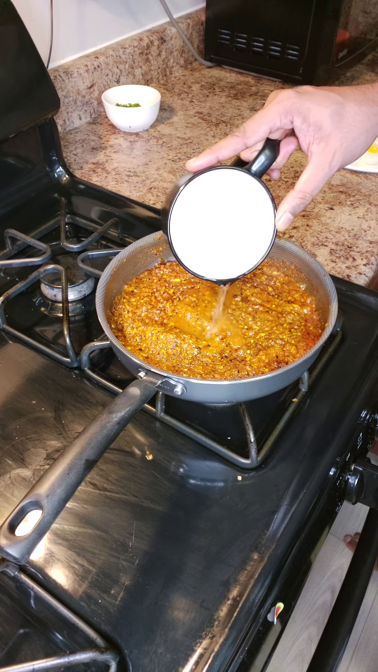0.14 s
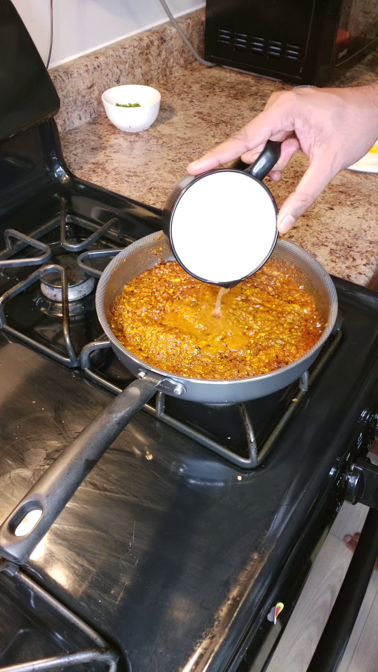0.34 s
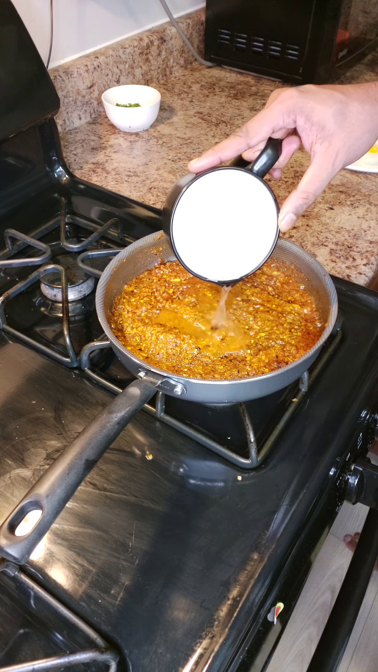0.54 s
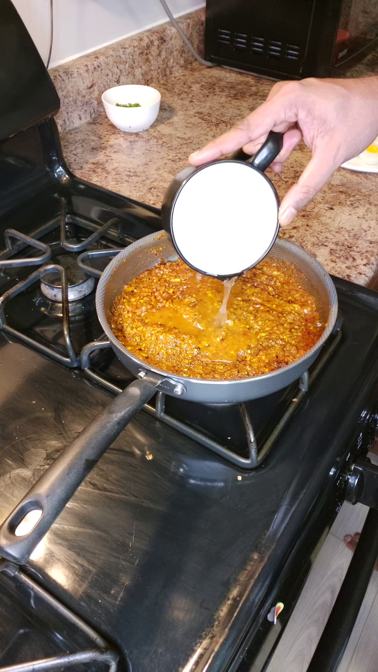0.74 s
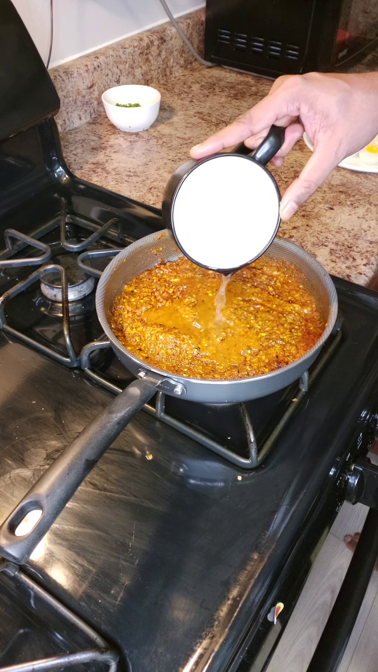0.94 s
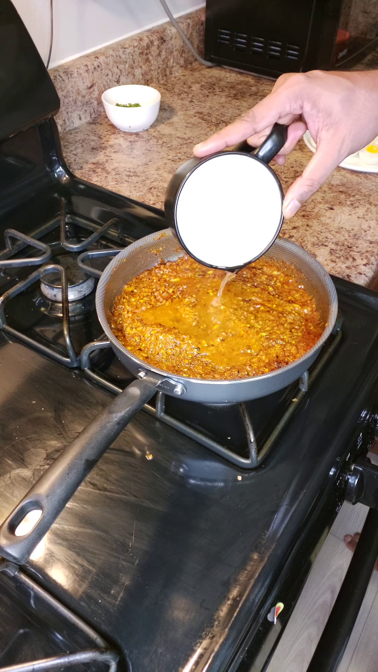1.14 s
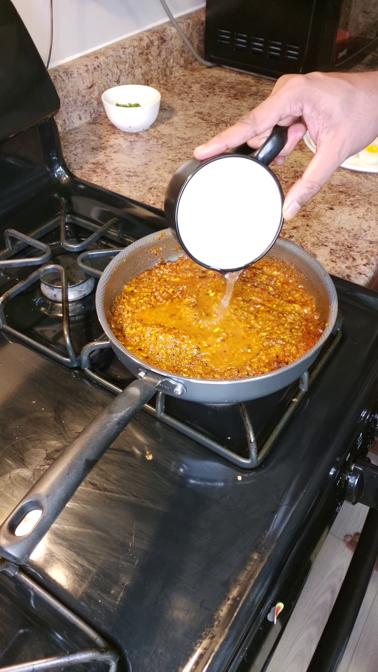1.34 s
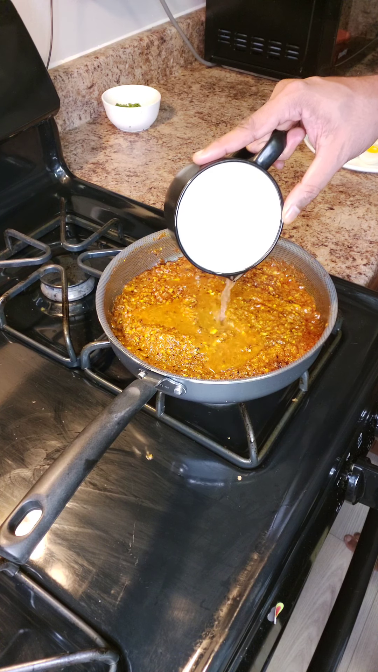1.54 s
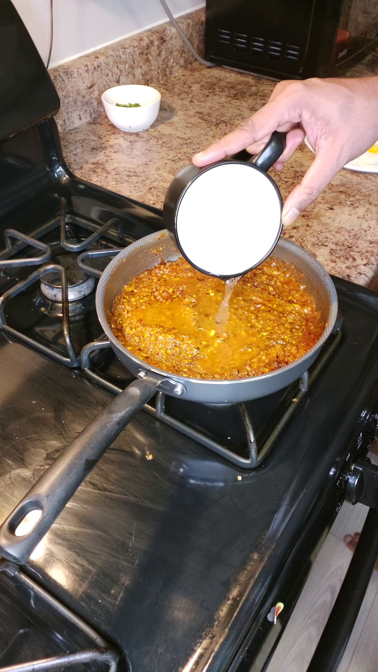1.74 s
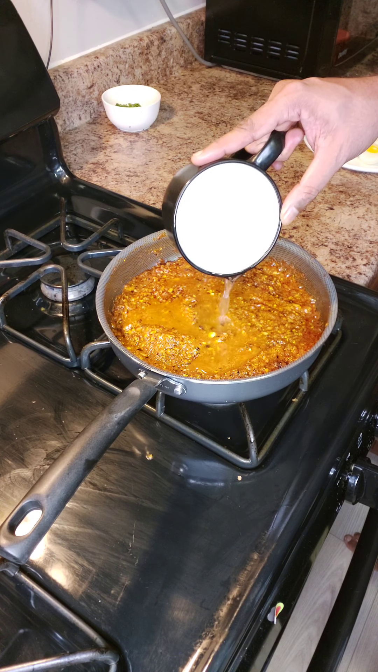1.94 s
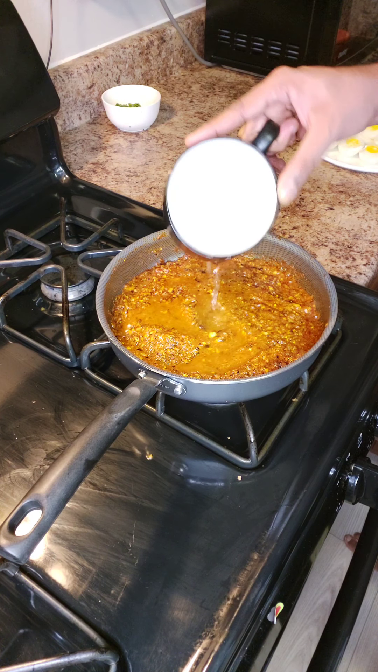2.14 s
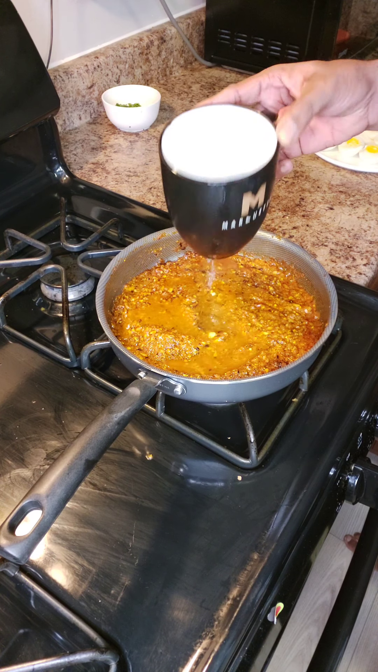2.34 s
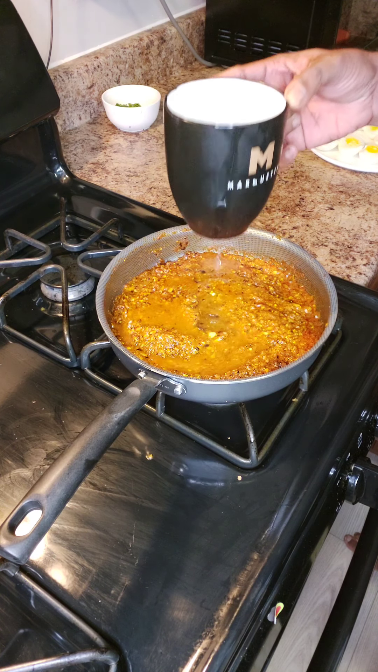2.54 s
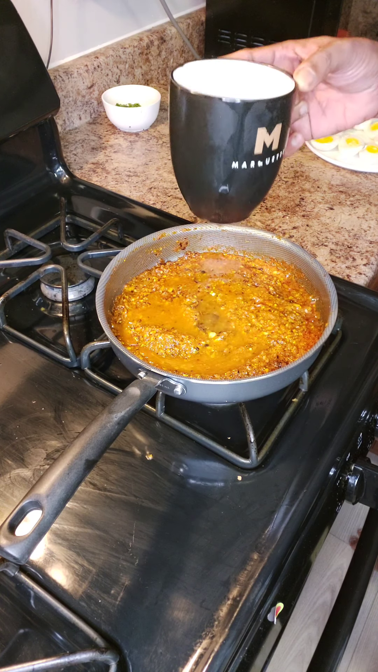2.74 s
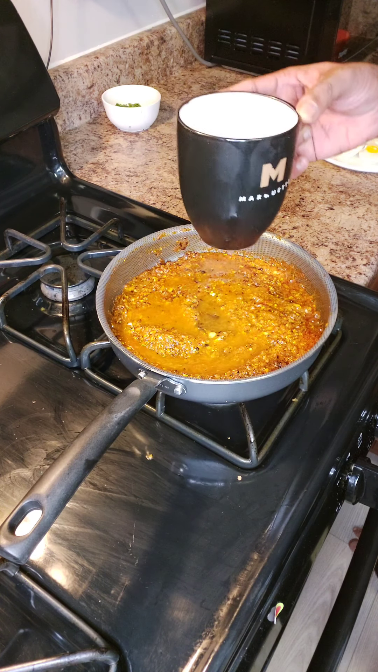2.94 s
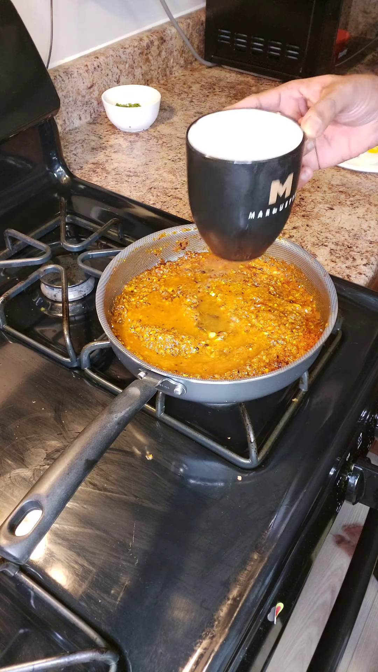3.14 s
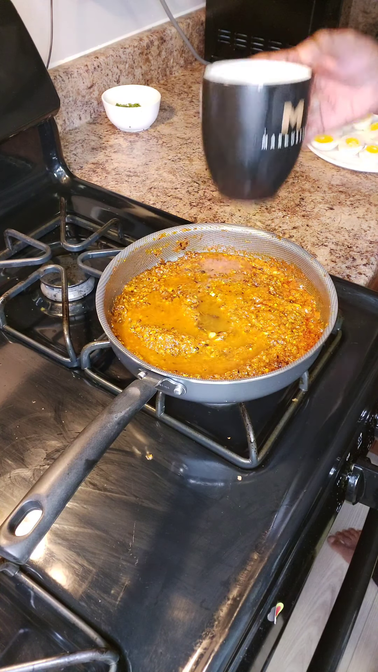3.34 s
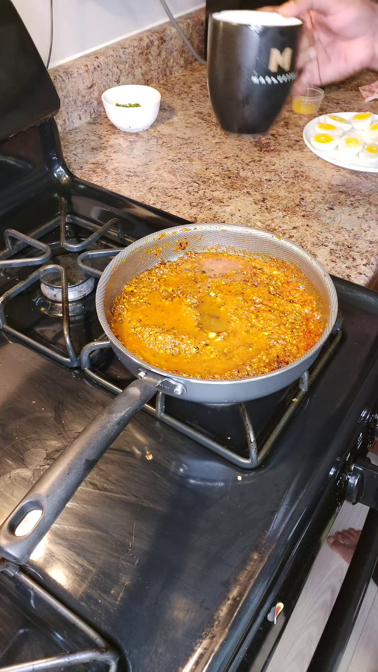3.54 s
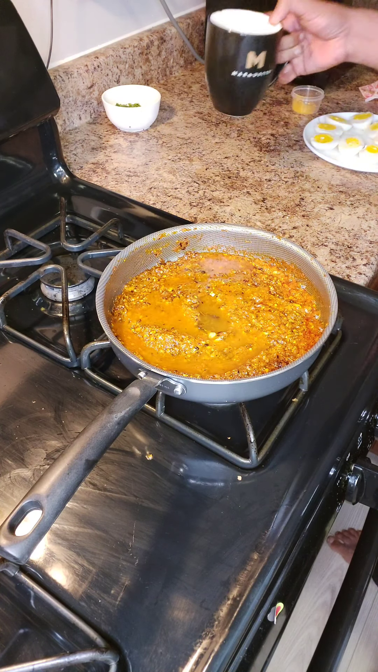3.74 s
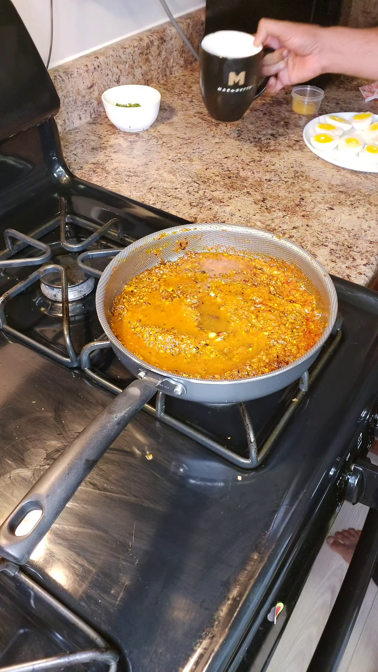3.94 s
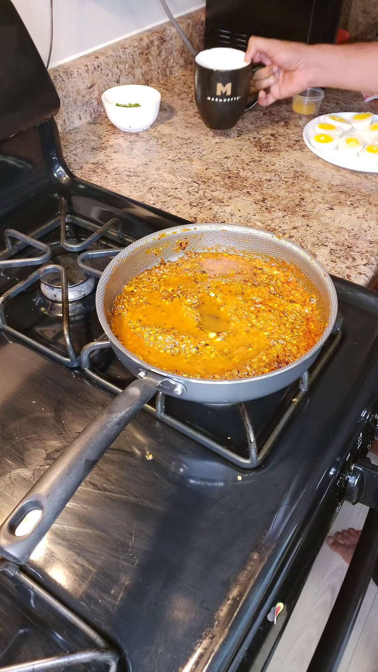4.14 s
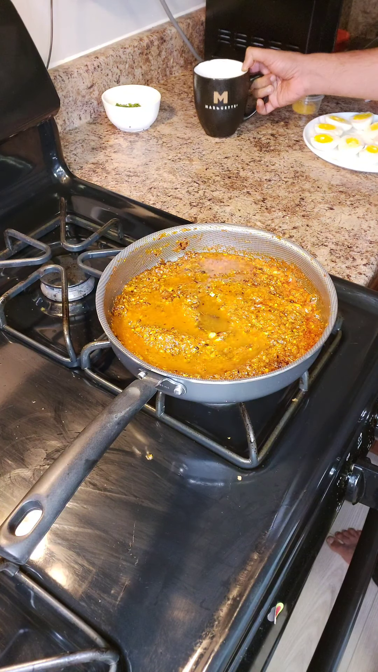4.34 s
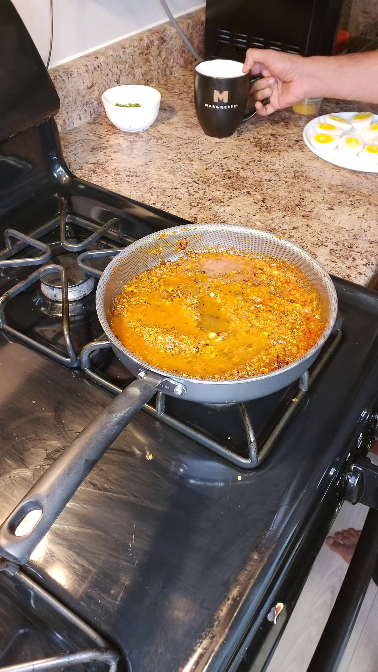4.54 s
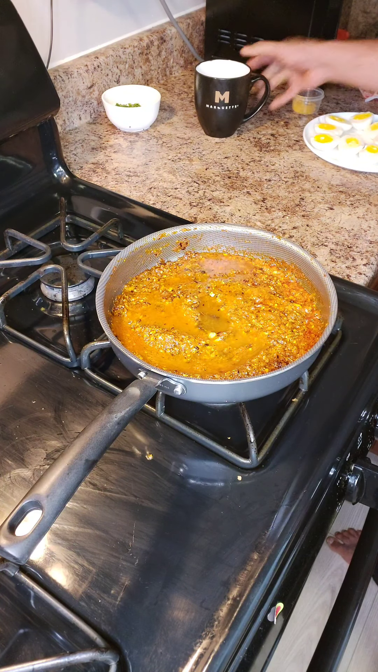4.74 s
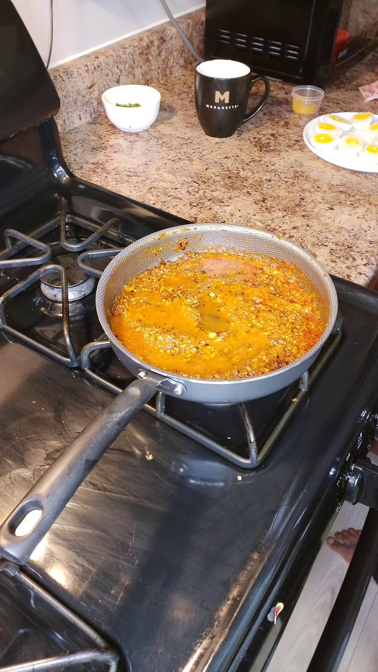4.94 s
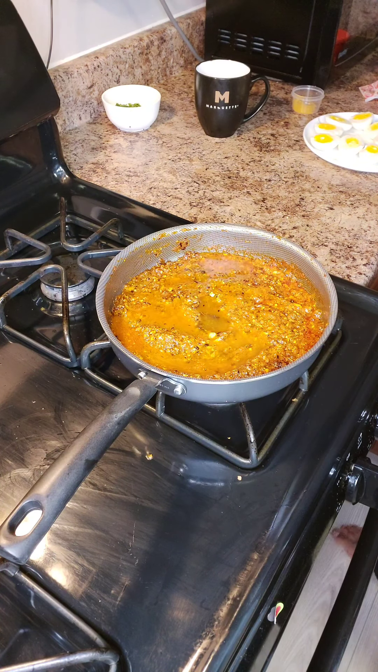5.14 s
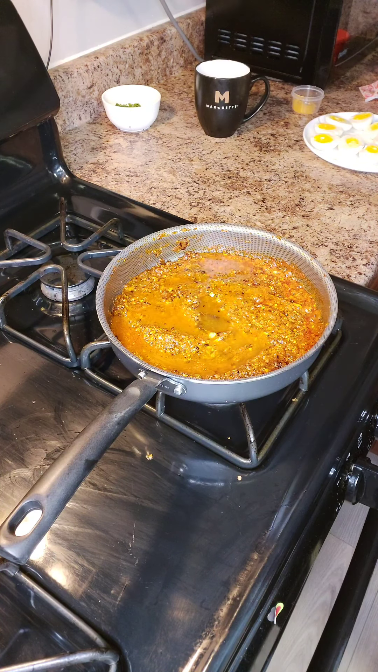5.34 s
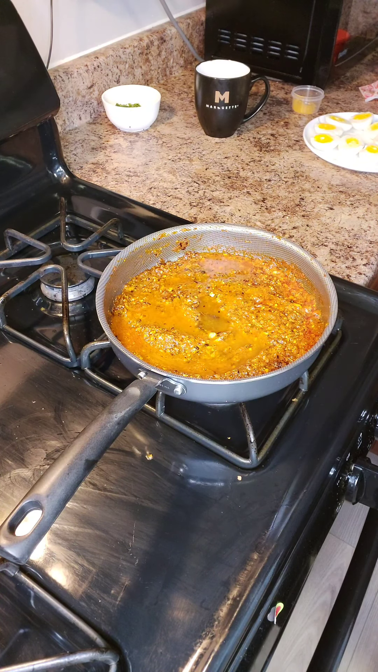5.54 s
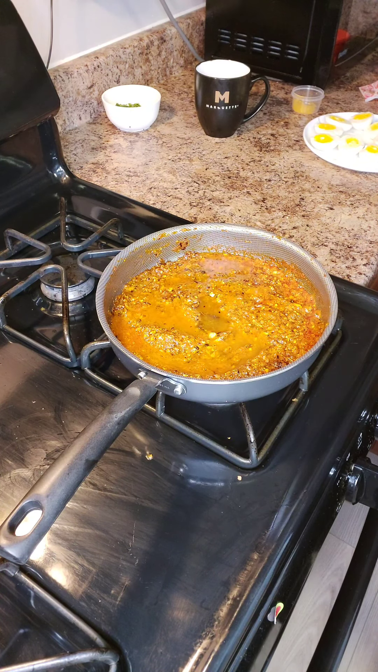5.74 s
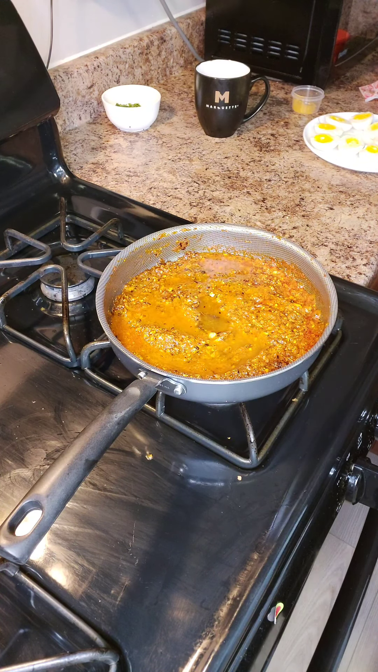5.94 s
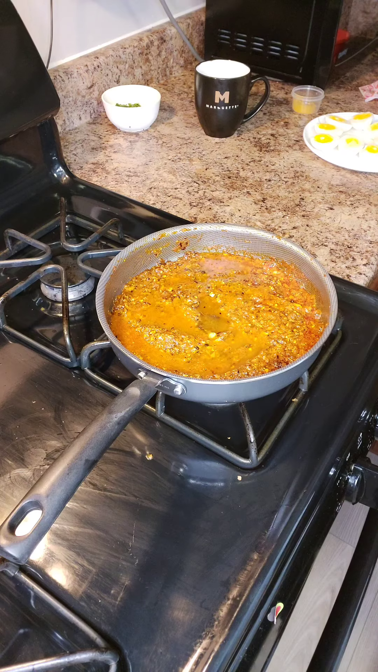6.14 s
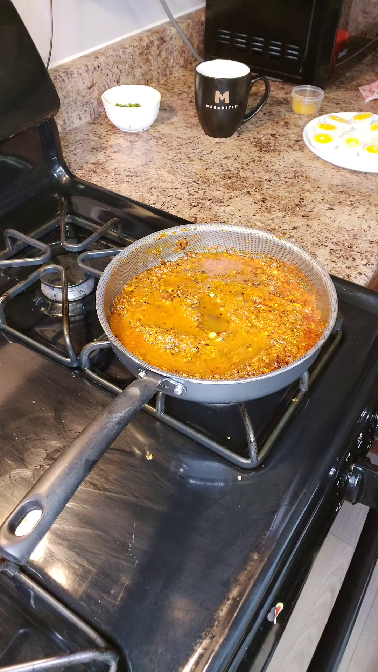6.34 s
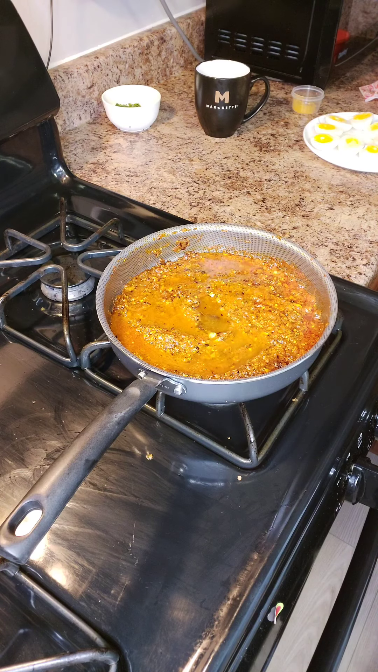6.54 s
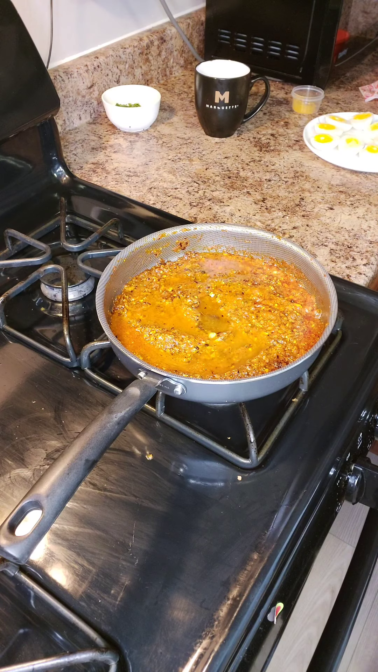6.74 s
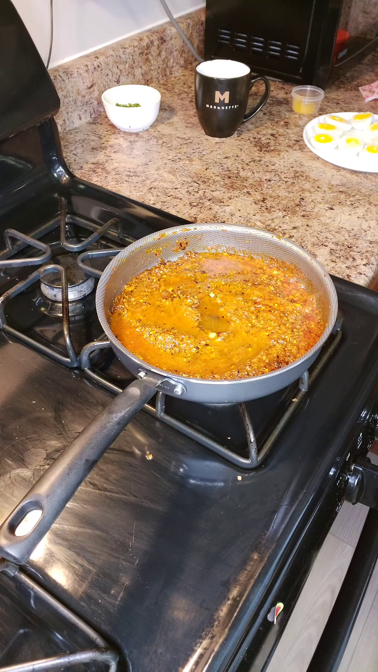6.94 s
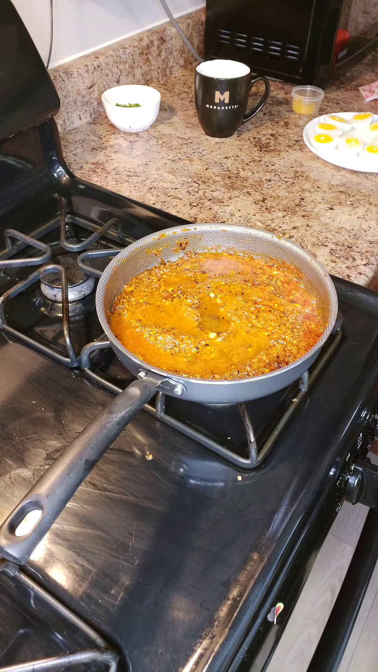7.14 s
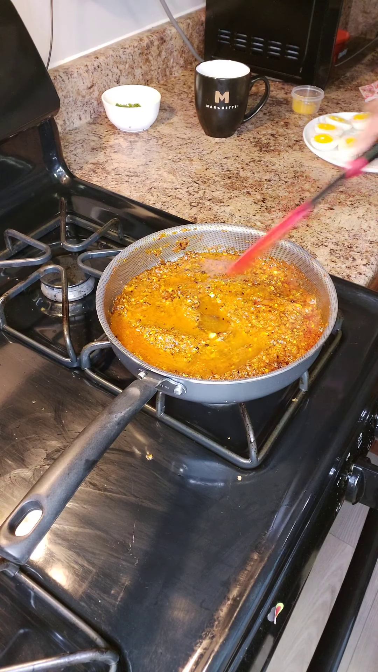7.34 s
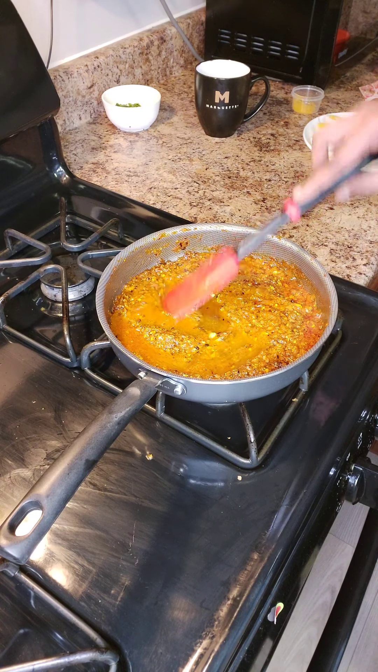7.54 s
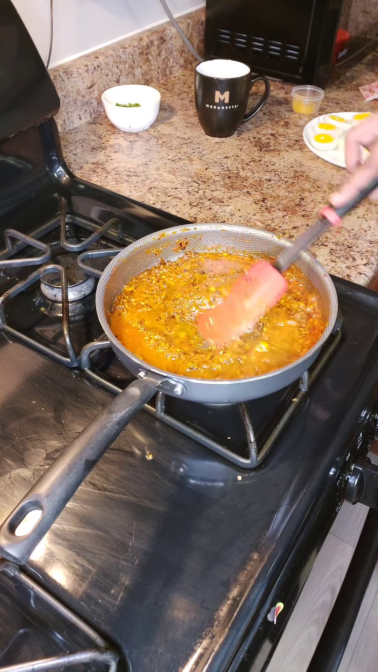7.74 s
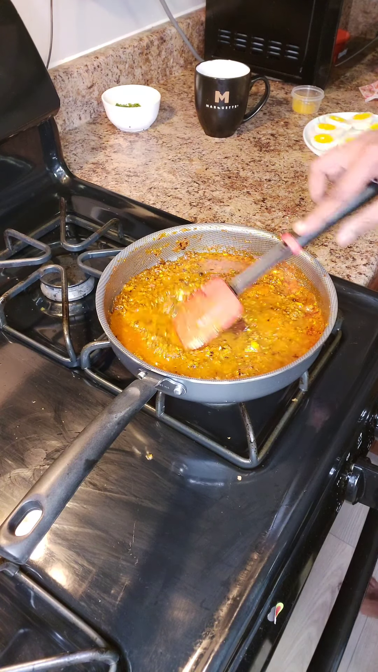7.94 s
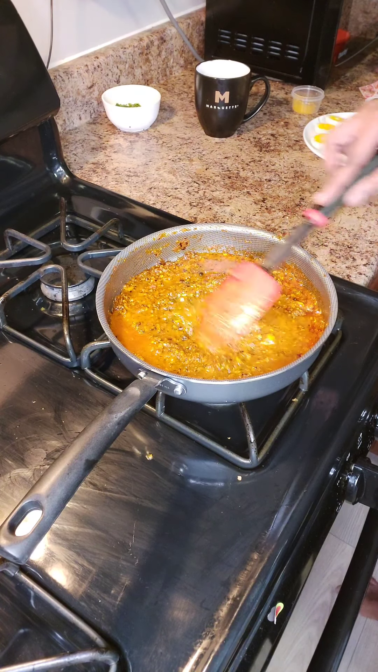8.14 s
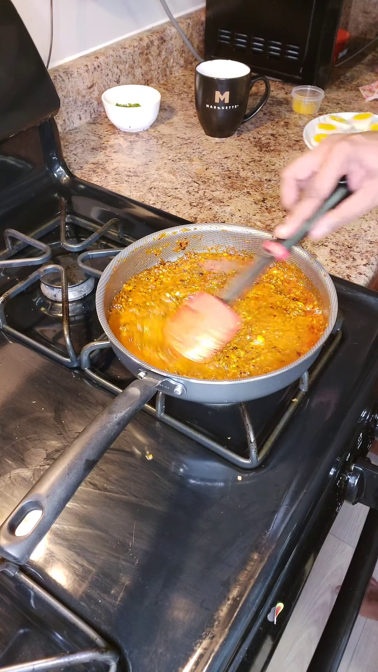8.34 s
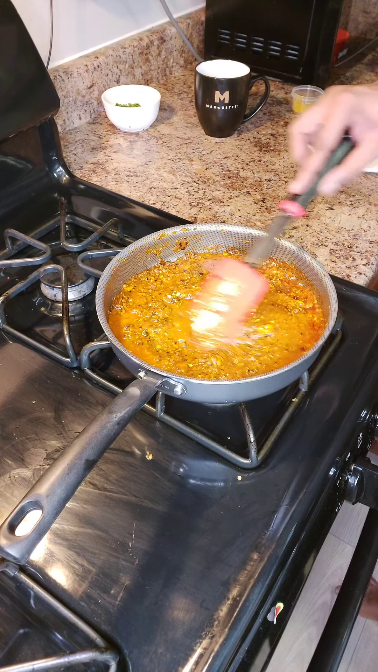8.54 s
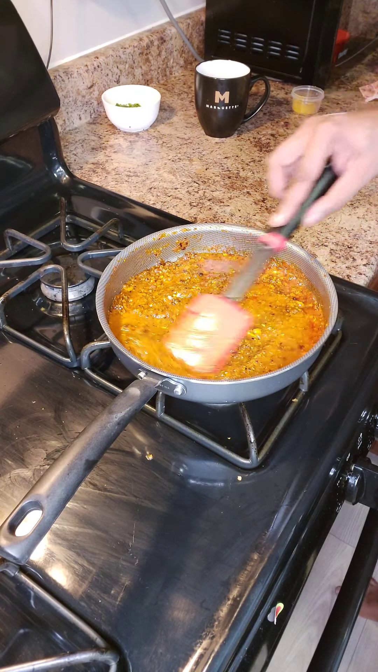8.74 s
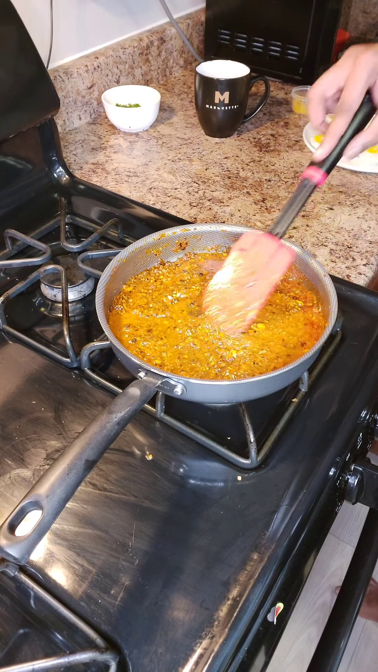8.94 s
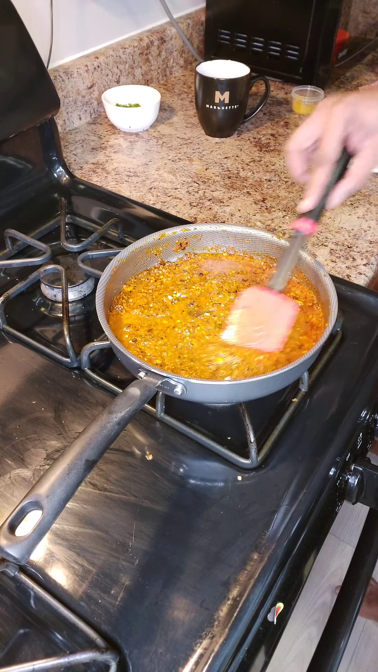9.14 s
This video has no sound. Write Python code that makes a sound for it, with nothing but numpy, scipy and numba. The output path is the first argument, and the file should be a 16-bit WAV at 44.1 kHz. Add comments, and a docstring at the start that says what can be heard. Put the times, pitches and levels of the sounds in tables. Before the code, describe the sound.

Water gurgles into simmering gravy, then a mug thuds down, a utensil clinks and a spatula squelches through the sauce.

```python
"""A small kitchen, at the stove. Gravy simmers in a pan, tiny steam bubbles fizzing over a low appliance hum.
Water poured from a mug drives air into it: large bubbles plop, droplets and bursting films spit.
The mug is set down in two thuds that shake the worktop, a utensil clinks on a dish and knocks about,
then a spatula squelches through the sauce, baring hot metal that fizzes."""
import sys
import numpy as np
from scipy import signal
from scipy.fft import rfft, irfft, next_fast_len
from scipy.io import wavfile
from scipy.ndimage import uniform_filter1d
from numba import njit

SR = 44100
rng = np.random.default_rng(int(sys.argv[2]) if len(sys.argv) > 2 else 0)


def wav_record(signal):
    """Record a signal, one row per channel, as 16-bit PCM in the file named by sys.argv[1]."""
    frames = np.transpose(np.atleast_2d(signal))
    bounded = np.clip(frames, -1, 1)
    # unit amplitude maps onto the largest positive 16-bit level
    quanta = np.round(bounded * 32767).astype(np.int16)
    wavfile.write(sys.argv[1], SR, quanta)


N = 409688
T = np.arange(N) / SR
TAIL = T[:SR]
TOP_HZ = 15900

# Tone curves. Each row: frequency in Hz, relative gain in dB.
ROOM_TONE_EQ = [(25, -10.5), (55, -5.5), (100, 1), (140, -3.5), (220, -10), (300, -3), (450, -14.5),
                (650, -4), (1000, -14.5), (1750, -16), (2200, -13), (2900, -24.5), (15000, -25.5)]
SIMMER_EQ = [(1500, -20), (3000, 0.5), (4300, 5), (7000, -1.5), (10000, 3.5), (12000, 2.5), (15500, -8.5)]
SCRAPE_EQ = [(250, 2), (700, 4), (2000, 3.5), (3000, -2), (4800, -0.5), (7500, -4.5), (11000, -4.5),
             (15500, -7)]
CRACK_EQ = [(600, 0), (1800, -4.5), (3000, -1), (4800, -3), (7500, -12), (11000, -10), (15500, -20.5)]
GURGLE_EQ = [(150, -26), (300, 9), (470, -10.5), (650, 6), (1000, -2.5), (1400, -0.5), (2200, -2.5),
             (2800, -10), (5000, -13)]
SPRAY_EQ = [(1500, -11), (2800, -3.5), (3900, 0.5), (4800, -4), (5500, -2), (7300, -6.5), (9500, -3.5),
            (12000, -1.5), (15500, -6)]
# The appliance's hum. Each row: frequency in Hz, level in dB.
HUM_PARTIALS = [(56, -68), (85, -80), (113, -75), (168, -82.5)]
# Things slid and picked up by the stove. Each row: centre and half length in seconds, level in dB.
SLIDE_CUES = [(3.27, 0.033, -59.5), (4.028, 0.039, -65), (5.252, 0.062, -60), (6.103, 0.048, -53)]
# The worktop and the cabinet under it. Each row: mode in Hz, relative level in dB, T60 in seconds.
WORKTOP_MODES = [(85, -7.5, 0.35), (120.7, -15.5, 0.46), (147, -6.5, 0.17), (190, -5.5, 0.13),
                 (249.3, -7, 0.093), (297.3, -8.5, 0.2), (322.8, -8, 0.35), (405, -1, 0.26),
                 (471, -9, 0.07), (569, -12.5, 0.42), (662, 0, 0.053), (846, -13, 0.16), (884, -3, 0.057),
                 (947, -11, .24), (1018, -5.5, 0.07), (1394, -2.5, 0.1)]
# What strikes the worktop. Each entry: contact low-pass, bass cut and own note in Hz,
# crack in dB against the thud, left minus right in dB.
STRIKERS = {"mug": (601.5, 99, 304, -29.5, 1), "dish": (1895, 300, 430, -16, 1.8),
            "utensil": (454, 65, 424, -15, 1), "soft bump": (98, 82, 121, -37, 1)}
# Blows on the worktop. Each row: start in seconds, level in dB, striker.
KNOCK_CUES = [(4.404, -18.5, "mug"), (4.432, -35, "mug"), (4.443, -29.5, "mug"), (4.57, -36.5, "mug"),
              (4.643, -25, "mug"), (4.813, -52, "mug"), (5.396, -57.5, "utensil"), (5.460, -25, "dish"),
              (5.524, -31.5, "utensil"), (5.611, -37.5, "utensil"), (5.815, -36.5, "dish"),
              (5.958, -52, "utensil"), (6.26, -57.5, "soft bump"), (6.294, -55, "soft bump"),
              (6.402, -40.5, "utensil"), (6.44, -40, "utensil"), (6.443, -39, "soft bump"),
              (6.472, -53, "utensil"), (6.534, -53.5, "utensil"), (6.531, -57.5, "soft bump"),
              (7.166, -59, "soft bump"), (8.032, -57.5, "soft bump")]
# The dish's ring. Each row: mode in Hz, relative level in dB, T60 in seconds.
DISH_MODES = [(1450, 4.5, 0.21), (1644, 1.5, 0.58), (1780, 6, 0.19), (2076, -19, 1), (2565, 2, 0.37),
              (3693, 3, 0.099), (3760, -11.5, 0.68), (4890, 0.5, 0.1), (4900, -28, 0.27), (5900, -19, 0.19),
              (6284, -4, 0.17), (7843, -5, 0.067), (9400, -10, 0.16), (11350, -12, 0.16)]
# Utensil on dish. Each row: start in seconds, level in dB, contact low-pass and bass cut in Hz.
CLINK_CUES = [(5.460, -33, 6500, 1100), (5.512, -37, 5960, 2060), (5.541, -40.5, 10900, 3200),
              (5.605, -43, 4940, 2130), (5.815, -54, 4500, 2500), (5.958, -66, 4500, 2470)]
# Spatula strokes. Each row: start and length in seconds, squelch and fizz in dB,
# opening pitch of the air pockets in Hz.
STROKE_CUES = [(7.448, .085, -67, -61.5, 1900), (7.634, 0.042, -69, -62.5, 1270),
               (7.953, 0.087, -69, -69, 1940), (8.173, 0.12, -68, -70, 2250), (8.385, .055, -66, -75, 2529),
               (8.437, 0.03, -61, -58.5, 885), (8.579, 0.14, -64, -65.5, 1500),
               (8.701, 0.053, -62.5, -61.5, 1064), (8.83, 0.018, -64, -53, 2600),
               (9.05, 0.05, -75, -88, 742)]
# Large air bubbles. Each row: start in seconds, relative level in dB, pitch in Hz.
PLOP_CUES = [(0.075, -33.5, 1400), (0.437, -32, 1420), (0.521, -33.5, 1370), (0.928, -38.5, 1110),
             (0.964, -36.5, 1060), (1.009, -36.5, 1050), (1.119, -32.5, 1150), (1.163, -38, 1200),
             (1.177, -34, 1120), (1.33, -38, 1590), (1.344, -32, 1340), (1.373, -31.5, 970),
             (1.656, -39, 1040), (1.743, -36.5, 1010), (1.825, -40.5, 1040), (1.959, -39, 980),
             (1.994, -37, 990), (2.084, -44.5, 824), (2.227, -45.5, 700), (6.734, -48.5, 674)]
# Droplets and bursting films. Each row: start in seconds, relative level in dB, pitch in Hz.
SPIT_CUES = [(.0305, -32.5, 11700), (.0624, -32.5, 9900), (.105, -31, 10200), (.316, -37, 10400),
             (.634, -37.5, 9400), (.964, -37, 9000), (1.078, -42, 3060), (1.12, -42.5, 2260),
             (1.161, -31.5, 11600), (1.5, -38, 12400), (1.518, -37.5, 5600), (1.557, -42, 3060),
             (1.6565, -38, 3700), (2.149, -34, 10500), (2.1874, -35, 12000), (2.2265, -32, 11500),
             (2.2275, -45, 2760), (2.575, -44, 12600)]
# The stream wobbles and splashes. Each row: start and length in seconds, gurgle and spray in dB.
SPLASH_CUES = [(.02, 0.12, -56, -63), (.435, 0.019, -59, -55.5), (.63, .015, -64, -52.5),
               (.96, 0.17, -54.5, -54), (1.499, 0.082, -58.5, -52.5), (1.655, 0.077, -57, -57.5),
               (1.82, 0.033, -71, -56), (2.226, 0.0072, -52, -48)]


def gain_of(db):
    """Decibels to amplitude."""
    return 10 ** (np.asarray(db) / 20)


def unit(x):
    """Scale to rms 1."""
    return x / np.sqrt(np.mean(x ** 2))


def attack_unit(x):
    """Scale a hit to rms 1 over its first 50 ms."""
    return x / np.sqrt(np.mean(x[..., :SR // 20] ** 2))


def fade(t60):
    """Exponential decay, one second long."""
    return np.exp(-np.log(1000) * TAIL / t60)


def swell(start, length_s, attack_s, release_s):
    """Envelope that rises, holds, and dies away after its length."""
    age = T - start
    return np.clip(age / attack_s, 0, 1) * np.exp(-np.maximum(age - length_s, 0) / release_s)


def walk(rate_hz):
    """Smooth random wander, spread near 1."""
    return np.interp(T * rate_hz, np.arange(N // 100), rng.standard_normal(N // 100))


def add(track, start_s, sound):
    """Drop a sound into a track."""
    first = int(start_s * SR)
    track[..., first:first + sound.shape[-1]] += sound[..., :N - first]


def pan(db):
    """Channel gains, the left louder by db."""
    return gain_of(np.array([[db], [-db]]) / 2)


def cut(x, hz, kind):
    """Second-order low-pass or high-pass."""
    return signal.sosfilt(signal.butter(2, hz, kind, fs=SR, output="sos"), x)


def colour(x, curve):
    """Minimum-phase EQ along a curve of (Hz, dB) points."""
    n = next_fast_len(x.shape[-1] + SR // 10, True)
    hz, db = np.transpose(curve)
    bin_db = np.interp(np.log(np.fft.rfftfreq(n, 1 / SR) + 1), np.log(hz), db)
    cepstrum = irfft(np.log(gain_of(bin_db)), n)[:n // 2]
    cepstrum[1:] *= 2
    return irfft(rfft(x, n) * np.exp(rfft(cepstrum, n)), n)[..., :x.shape[-1]]


def diffuse(size, apart_hz=720, bass_side=0.24):
    """Noise from all around: nearly mono in the bass, wide in the treble."""
    likeness = (1 - 2 * bass_side ** 2) / (1 + (np.fft.rfftfreq(size, 1 / SR) / apart_hz) ** 4)
    mid, side = rfft(rng.standard_normal((2, size))) * np.sqrt([(1 + likeness) / 2, (1 - likeness) / 2])
    return irfft(np.array([mid + side, mid - side]), size)


def ring(modes):
    """Struck (Hz, dB, T60) modes; neighbours swing in opposite directions."""
    return sum((-1) ** k * gain_of(db) * fade(t60) * np.sin(2 * np.pi * hz * TAIL)
               for k, (hz, db, t60) in enumerate(modes))


@njit
def bubbles(start_s, hz, cycles, size, glide):
    """Damped sines that die 60 dB in so many cycles, rising in pitch as they near the surface."""
    out = np.zeros(N)
    for k in range(len(start_s)):
        first, length = int(start_s[k] * SR), cycles * SR / hz[k]
        for i in range(min(int(length) + 1, N - first)):
            age = i / length
            phase = 2 * np.pi * cycles * age * (1 + glide * age / 2)
            out[first + i] += size[k] * np.exp(-6.9 * age) * np.sin(phase)
    return out


def swarm(count, low_hz, high_hz, cycles, spread_db):
    """Countless bubbles of random timing and strength, pitched evenly per octave from low to high, the higher
    ones louder."""
    when, pitch, luck = rng.random((3 * count,)).reshape(count, 3).T
    hz = low_hz * (high_hz / low_hz) ** pitch
    size = gain_of(-spread_db * np.log(np.maximum(luck, 0.01))) * (hz / low_hz) ** 1.5
    return unit(bubbles(when * N / SR, hz, cycles, size, glide=0.13))


def churn(gurgle, spray, steady, cues, attack_s, release_s):
    """Liquid in motion: trapped air gurgles and fine spray crackles, surging on each cue."""
    power = np.square(steady)
    for start, length_s, gurgle_db, spray_db, *_ in cues:
        surge = swell(start, length_s, attack_s, release_s)
        power += np.outer(gain_of([gurgle_db, spray_db]), surge) ** 2
    gurgle_gain, spray_gain = np.sqrt(power)
    return unit(colour(gurgle, GURGLE_EQ)) * gurgle_gain + unit(colour(spray, SPRAY_EQ)) * spray_gain


def kitchen_reverb(x, early_db, late_db, early_t60=0.11, low_t60=0.9, high_t60=0.34, split_hz=1500):
    """Direct sound, left first; a quick wash from stove, tiles and cupboards; then the room's tail."""
    early = diffuse(SR) * fade(early_t60)
    noise = diffuse(SR)
    late = cut(noise, split_hz, "low") * fade(low_t60) - cut(noise, split_hz, "high") * fade(high_t60)
    paths = (gain_of(early_db) * unit(early) + gain_of(late_db) * unit(late)) / np.sqrt(SR)
    paths[:, :SR // 1000] = 0  # 1 ms pre-delay
    paths[[0, 1], [0, 4]] += 1  # direct sound
    # the room spreads sound in time but passes every band equally
    power = uniform_filter1d(np.mean(abs(rfft(paths)) ** 2, axis=0), size=40)
    flattening_eq = np.transpose([1 + np.arange(len(power)), -10 * np.log10(power)])
    return signal.fftconvolve(np.atleast_2d(x), colour(paths, flattening_eq), axes=-1)[:, :N]


def across_gravy(x, early_db, late_db, spots=4, hop=SR // 60):
    """From moment to moment the bubbles break at different spots, each with its own echoes."""
    spot = np.repeat(rng.integers(spots, size=N // hop + 1), hop)[:N]
    gates = [uniform_filter1d(1.0 * (spot == k), size=64) for k in range(spots)]
    return sum(kitchen_reverb(x * gate, early_db, late_db) for gate in gates)


def room_tone(air_db=-66.5):
    """The bed: a soft rush of burner and room, with a wavering appliance hum."""
    air = unit(colour(diffuse(N, bass_side=0.34), ROOM_TONE_EQ)) * gain_of(air_db + 1.5 * walk(4.8))
    hum = np.zeros(N)
    for hz, db in HUM_PARTIALS:
        waver_db, drift = 1.5 * walk(4), 0.7 * walk(5)
        hum += gain_of(db + waver_db) * np.sqrt(2) * np.sin(2 * np.pi * hz * T + drift)
    return (air + hum) * pan(3.9)


def simmer(level_db=-70, cooling_db_per_s=0.13):
    """Tiny steam bubbles burst round the rim, a little calmer as the cold water spreads."""
    steam = swarm(count=22000, low_hz=1500, high_hz=15070, cycles=35, spread_db=3.5)
    fader_db = level_db - cooling_db_per_s * (T - T.mean()) + 0.5 * walk(5.2)
    return unit(colour(steam, SIMMER_EQ)) * gain_of(fader_db)


def slides():
    """Brief gritty friction that swells and dies."""
    grit = swarm(count=30000, low_hz=300, high_hz=15800, cycles=0.79, spread_db=-2)
    envelope = sum(gain_of(db) * np.exp(-((T - centre) / half) ** 2) for centre, half, db in SLIDE_CUES)
    return unit(colour(grit, SCRAPE_EQ)) * envelope


def knocks(dense_db=4, own_db=-6, shaft_db=-19, shaft_hz=4930):
    """Each blow rings the striker and the worktop's modes; softer contact makes a duller thud."""
    out = np.zeros((2, N))
    main_modes = attack_unit(ring(WORKTOP_MODES))
    metal_shaft = gain_of(shaft_db) * attack_unit(ring([(shaft_hz, 0, 0.12)]))
    for start, db, striker in KNOCK_CUES:
        contact_hz, bass_hz, own_hz, crack_db, pan_db = STRIKERS[striker]
        dense_modes = gain_of(dense_db) * attack_unit(cut(diffuse(SR), 2160, "low") * fade(t60=0.27))
        worktop = attack_unit(cut(cut(main_modes + dense_modes, contact_hz, "low"), bass_hz, "high"))
        own_note = gain_of(own_db) * attack_unit(ring([(own_hz, 0, 0.093)]))
        crack = gain_of(crack_db) * attack_unit(colour(diffuse(SR) * fade(t60=0.44), CRACK_EQ))
        hit = attack_unit(worktop + own_note) + crack + metal_shaft * (striker == "utensil")
        add(out, start, pan(pan_db) * gain_of(db) * hit)
    return out


def clinks(flutter_db=4):
    """The utensil bounces on the dish; harder contact wakes higher modes, fluttering as the dish rocks."""
    out = np.zeros(N)
    for start, db, contact_hz, bass_hz in CLINK_CUES:
        dish = sum(ring([mode]) * gain_of(flutter_db * walk(44)[:SR]) for mode in DISH_MODES)
        softened = cut(dish, contact_hz, "low")
        thinned = cut(cut(softened, bass_hz, "high"), bass_hz, "high")
        add(out, start, gain_of(db) * attack_unit(thinned))
    return out * pan(4)


def air_pockets(count=1800, fall_oct_per_s=4, pitch_spread=0.17):
    """Air pockets behind each spatula stroke drop in pitch as they open."""
    starts, opening_hz = np.transpose(STROKE_CUES)[[0, -1]]
    scatter, detune, size = rng.standard_normal((count, 3)).T
    when = starts[0] + (scatter % 1) * (T[-1] - starts[0])
    stroke = np.searchsorted(starts, when, "right") - 1
    age = when - starts[stroke]
    hz = opening_hz[stroke] * 2 ** (-fall_oct_per_s * age) * np.exp(pitch_spread * detune)
    pockets = bubbles(when, hz, cycles=10, size=size * np.sqrt(hz), glide=0.23)
    return pockets / np.std(pockets[T > starts[0]])


def stir(squelch_db=-76.5, fizz_db=-73, pocket_db=1, attack_s=0.0073, release_s=0.026):
    """The spatula squelches through thick sauce and bares hot metal, dragging on between strokes."""
    pockets = gain_of(pocket_db) * air_pockets()
    squelch = swarm(count=6000, low_hz=225, high_hz=4500, cycles=2.2, spread_db=4.5) + pockets
    fizz = swarm(count=14000, low_hz=1820, high_hz=15400, cycles=2.9, spread_db=5.5)
    drag = swell(start=7.45, length_s=1.27, attack_s=attack_s, release_s=release_s)
    steady = [drag * gain_of(squelch_db), drag * gain_of(fizz_db)]
    return churn(squelch, fizz, steady, STROKE_CUES, attack_s, release_s)


def pops(cues, cycles, glide, note_db, snap_db):
    """Single bubbles that stand out of the swarm; each opens with the snap of a closing cavity."""
    starts, db, hz = np.transpose(cues)
    note = bubbles(starts, hz, cycles, gain_of(db + note_db), glide)
    snap = bubbles(starts, hz, cycles=2, size=gain_of(db + snap_db), glide=0.0)
    return note + snap


def pour(gurgle_db=-60, spray_db=-60.5, tipping_db_per_s=1, stop_s=2.11, trickle_s=0.2):
    """The stream drives air into the gravy, gurgling more as the mug tips, until the mug is lifted."""
    gurgle = swarm(count=6000, low_hz=216, high_hz=4420, cycles=5.8, spread_db=3.5)
    spray = swarm(count=16000, low_hz=1730, high_hz=14900, cycles=7.1, spread_db=3.5)
    flow = np.exp(-np.maximum(T - stop_s, 0) / trickle_s)
    steady = [flow * gain_of(gurgle_db + tipping_db_per_s * T), flow * gain_of(spray_db)]
    return churn(gurgle, spray, steady, SPLASH_CUES, attack_s=0.002, release_s=0.0058)


def scene():
    """The pan is up close, wrapped in a dense wash of quick echoes; the worktop blows sound drier."""
    plops = pops(PLOP_CUES, cycles=19.8, glide=0.095, note_db=2, snap_db=-32)
    spits = pops(SPIT_CUES, cycles=20.7, glide=0.05, note_db=7, snap_db=6.5)
    gravy = pour() + stir() + simmer() + plops + spits
    near = across_gravy(gravy, early_db=6, late_db=-7) * pan(1.36)
    clatter = knocks() + clinks() + slides()
    far = kitchen_reverb(clatter, early_db=-3, late_db=-5, early_t60=0.15, low_t60=0.55, high_t60=0.55)
    return near + far + room_tone()


def record(dry):
    """Master EQ: trim the deepest rumble and the very top."""
    steep_low_pass = signal.ellip(10, 0.2, 70, TOP_HZ, fs=SR, output="sos")
    return signal.sosfilt(steep_low_pass, cut(dry, 30, "high"))


dry = scene()
out = record(dry)
wav_record(out)
```